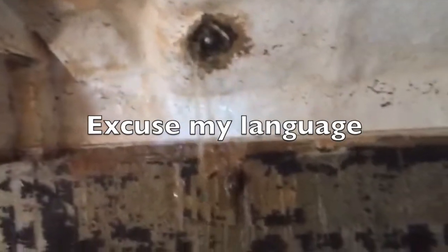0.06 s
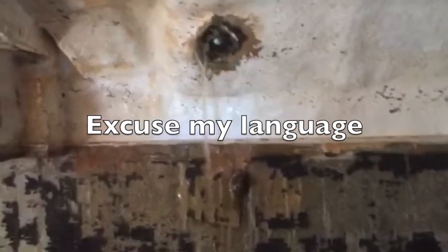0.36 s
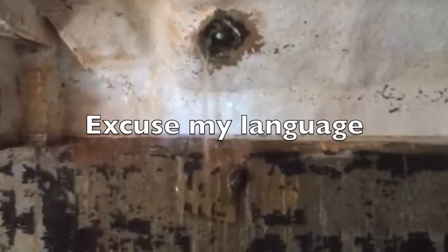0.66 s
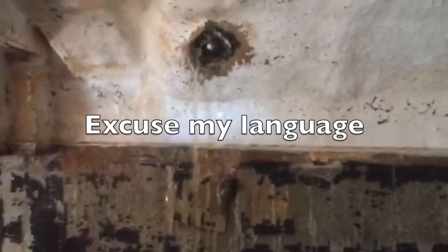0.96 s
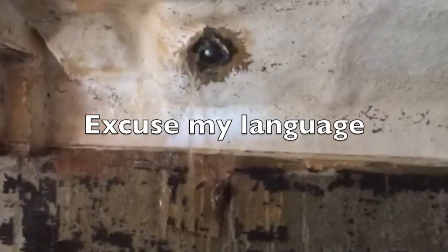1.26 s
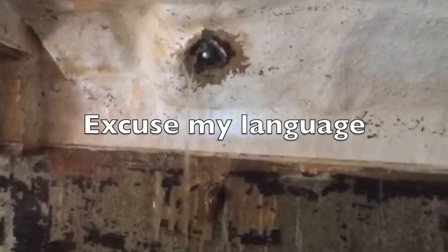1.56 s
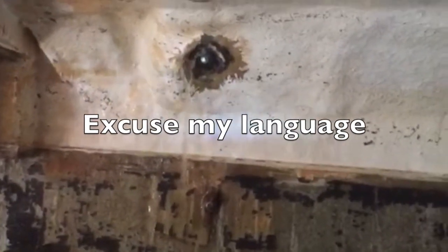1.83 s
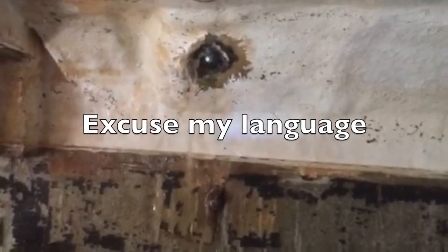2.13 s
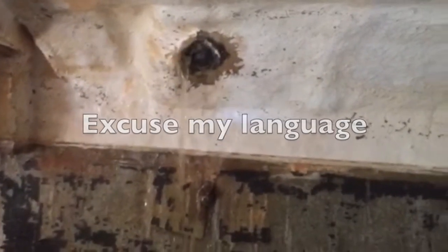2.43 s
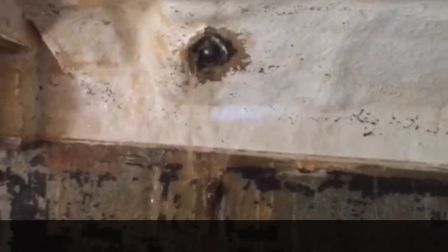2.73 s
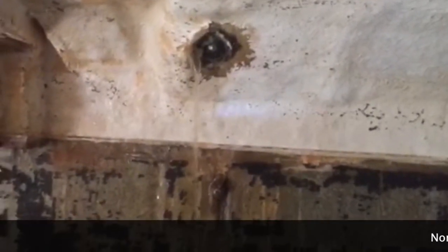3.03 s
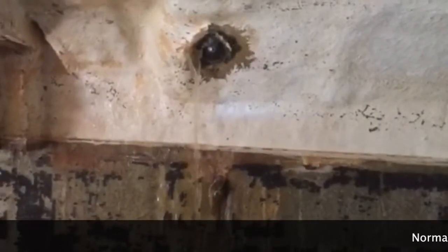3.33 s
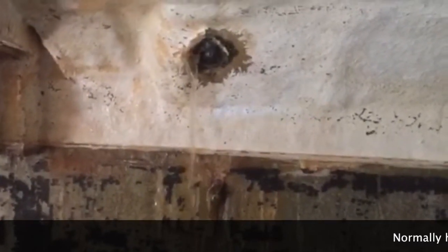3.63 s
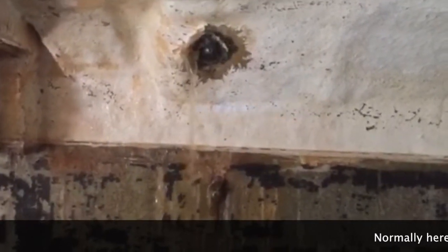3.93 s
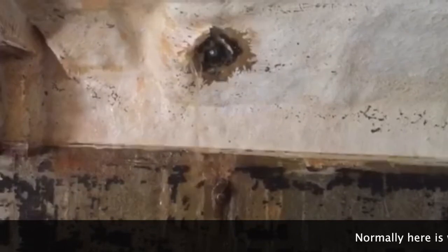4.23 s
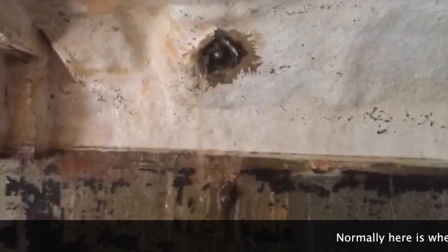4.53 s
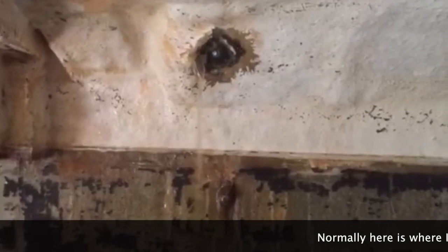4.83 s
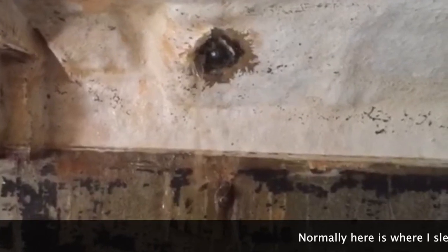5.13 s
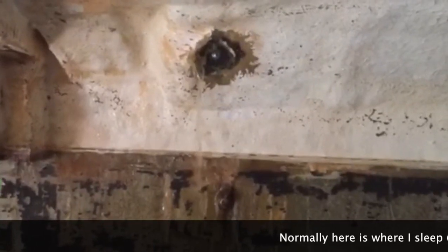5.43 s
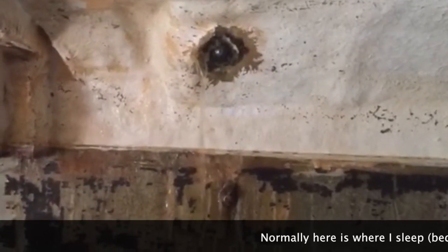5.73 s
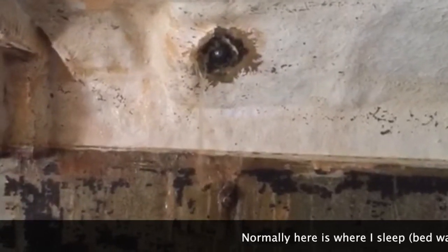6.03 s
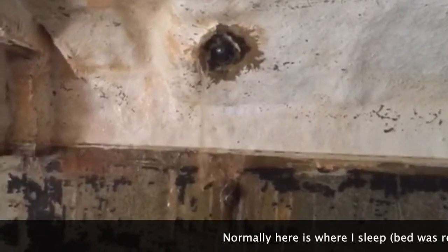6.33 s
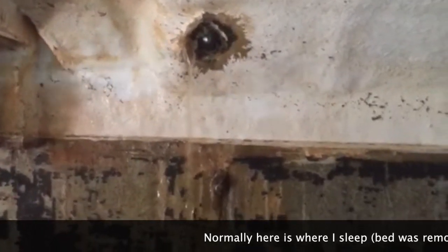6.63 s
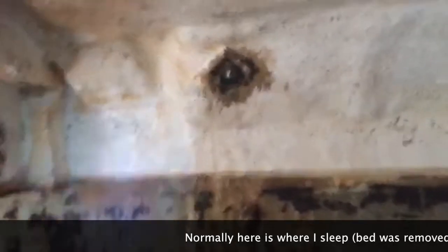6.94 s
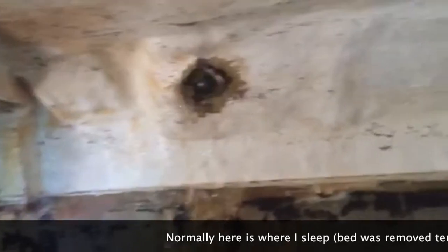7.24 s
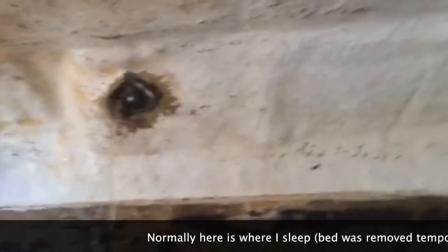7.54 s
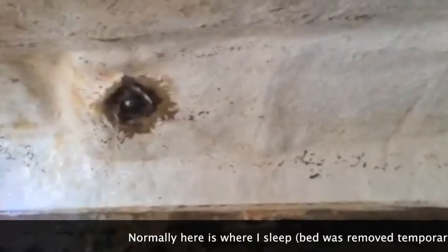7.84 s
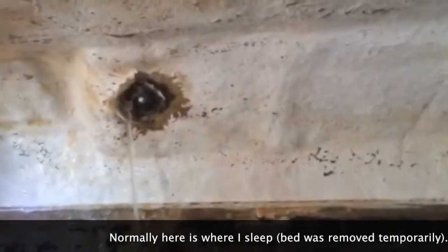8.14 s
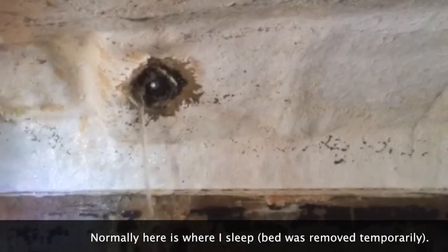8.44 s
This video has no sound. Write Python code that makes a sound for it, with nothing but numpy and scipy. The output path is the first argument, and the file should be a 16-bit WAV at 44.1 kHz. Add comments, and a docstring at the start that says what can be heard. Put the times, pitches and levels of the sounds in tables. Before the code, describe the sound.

Water leaks into a boat cabin with irregular ticking drips and a thin trickle, while dull rain patters on the deck outside.

```python
"""Drips from a leak in a boat's hull: each lands with a tick and a tiny ringing air bubble,
and the cramped cabin throws it back. The rainwater stream they break from trickles down the
inside wall: fizzing spray, splatter and gurgle, with a faint rustle-like wash around 7.3-8 s.
Outside, heavier drops thud on the deck amid dull rain patter and a low rumble."""
import sys
import numpy as np
from scipy import signal
from scipy.fft import rfft, irfft, next_fast_len
from scipy.io import wavfile

SR = 44100
rng = np.random.default_rng(int(sys.argv[2]) if len(sys.argv) > 2 else 0)


def persist_wave(psi):
    """Save psi, clipped to +-1, as 16-bit WAV."""
    counts = np.round(np.clip(psi, -1, 1) * 32767).astype(np.int16)
    wavfile.write(sys.argv[1], SR, np.atleast_2d(counts).T)


N = 378378

# big drips: t/s, relative tick energy/dB, bubble f/Hz, relative bubble energy/dB
DRIPS = [(0.3427, -10.5, 9310, -13), (0.4629, -7, 4570, -27), (0.843, -37, 10200, -14.5),
         (1.336, -34, 8600, -17), (1.4872, -20, 9600, -15), (1.6662, -11, 4430, -12.5),
         (1.801, -16.5, 3980, -36), (1.859, -21, 7800, -17), (2.0287, -16.5, 6360, -11),
         (2.294, -13, 11200, -25), (2.396, -50, 10000, -14.5), (2.47, -46, 1940, -31.5),
         (2.505, -49, 1520, -28.5), (2.55, -27, 1600, -29.5), (2.7308, -11, 7850, -21),
         (3.1175, -34, 7200, -8), (3.245, -14.5, 8900, -33), (3.2615, -17, 8400, -11),
         (3.292, -13, 11600, -25), (3.5094, -11, 6550, -12), (3.949, -21, 3850, -16),
         (4.1843, -32, 2410, -22.5), (4.211, -33, 4340, -26), (4.4974, -35, 6440, -15.5),
         (4.8076, -13, 5650, -5.5), (4.83, -14, 4540, -11.5), (5.0088, 6.5, 6600, -10),
         (5.4285, -34, 9800, -6), (5.6687, -19, 7060, -8.5), (5.728, -18, 4560, -28),
         (6.0994, 0.5, 5670, -16), (6.264, -14.5, 4440, -7.5), (6.2972, -19, 3700, -15.5),
         (6.4176, -13.5, 6620, -14), (6.7173, -25, 9520, -16), (6.8363, -25, 8750, -16.5),
         (6.994, -34, 9100, -15), (7.086, -20, 8790, -27), (7.2262, -20, 4850, -14.5),
         (7.2702, -19, 5960, -12), (7.3548, -18, 5700, -20), (7.3854, -6, 6140, -16),
         (7.4277, -11, 4800, -11), (7.5304, -26, 9400, -12), (7.6435, -15.5, 6900, -29),
         (7.8796, -15, 5000, -32), (7.895, -20, 3600, -22), (7.9347, -19, 3420, -22),
         (7.9873, -12.5, 6850, -28), (8.0417, -13.5, 8200, -35), (8.1675, -15.5, 8500, -23),
         (8.2837, -24, 11100, -12), (8.464, -31, 9200, -18)]
# wet wall resonances: f/Hz, width/Hz, level/dB re plain wall
WET_WALL_MODES = [(3600, 180, -13), (4000, 58, -14), (4280, 50, -13), (5710, 300, -4)]
# nearest wall reflections: delay/s, relative level/dB
WALL_ECHOES = [(.0015, -7.5), (.0071, -6), (0.0104, -10), (0.019, -11)]
# stream splatter: t/s, relative level/dB
SPLATTER_ENVELOPE = [(0.0, -59), (1.1, -57.5), (1.65, -57.5), (2.41, -60), (4.85, -58.5), (6.04, -62),
                     (6.24, -57), (6.79, -61.5), (7.41, -51.5), (8.58, -90)]
# stream gurgle, and a faint rustle-like wash around 7.3-8 s: t/s, relative level/dB
GURGLE_WASH_ENVELOPE = [(0.0, -64), (0.62, -72), (1.79, -60.5), (2.32, -67.5), (3.03, -64.5), (3.3, -64),
                        (3.58, -71.5), (4.66, -61), (4.83, -73), (5.33, -61.5), (5.83, -66), (6.14, -63),
                        (6.93, -70), (7.65, -58.5), (8.05, -70), (8.58, -69.5)]
# inside filter curves: f/Hz, level/dB
FIZZ_EQ = [(3000, -25), (5000, -34), (6000, -11), (7800, -10.5), (9000, -1), (10000, 3.5), (10450, -4),
           (11000, 1.5), (12000, 2.5), (15200, 1)]
SPLATTER_EQ = [(2000, -19), (3200, -4.5), (3800, -12.5), (4500, -6.5), (4900, -11.5), (5800, -2),
               (7500, -1), (9000, 8.5), (11000, -12)]
GURGLE_WASH_EQ = [(700, -3), (1250, 8.5), (1600, 8.5), (2400, 4.5), (3300, 5.5), (5000, 12.5)]
# drops thudding on the deck, placed by hand: t/s, relative level/dB
DECK_THUDS = [(0.464, -44), (1.243, -52), (1.309, -48.5), (1.359, -50), (1.891, -51.5), (2.98, -52),
              (3.155, -50.5), (3.368, -47), (3.51, -53), (3.619, -51), (3.722, -52), (3.948, -47.5),
              (4.137, -45.5), (4.497, -50.5), (5.009, -47), (5.642, -53.5), (6.04, -47.5), (6.7, -57.5),
              (7.085, -54), (8.167, -48.5)]
# hull panel resonances: f/Hz, width/Hz, level/dB re plain panel
HULL_MODES = [(159.2, 12.7, 8), (217, 13, 2.5), (266, 4.7, 12), (292.8, 7.6, 14), (346, 34, 5),
              (385.7, 12.2, 15.5), (498, 11, 12), (524, 11, 8), (584, 10, 3.5), (650, 56, 1), (691, 10, 11),
              (733, 6.7, 0), (933, 26, 15.5), (1203, 27, 11), (1308, 30, 9.5), (1317, 21, 6),
              (1478, 63, 13.5), (1783, 17, 14.5), (2150, 61, 6.5)]
# rain on the deck: t/s, level/dB
RAIN_ENVELOPE = [(0.0, -59), (1.4, -57), (4.3, -58), (4.95, -59), (6.6, -58.5), (8.58, -60)]
# outside filter curves: f/Hz, level/dB
THUD_EQ = [(150, 2.5), (350, 1), (700, 3), (1050, -2.5), (1500, -4.5), (3000, 0.5), (4500, -3), (8000, 5)]
DECK_EQ = [(90, -36), (160, -0.5), (300, -2.5), (450, -7), (700, -6.5), (820, -10.5), (1050, -21.5),
           (1600, -28), (3000, -28.5)]
RUMBLE_EQ = [(20, -39), (35, -15), (50, -1), (70, -11), (100, -12.5), (140, -21), (300, -16)]

CABIN_T60_S, DECK_T60_S = 0.18, 0.19


def drips(tick_gain_db=0.5, ring_gain_db=-2.5, deep_below_hz=2500):
    """Impact tick plus trapped bubble; large bubbles sit deeper and ring longer."""
    out = np.zeros(N)
    for t_s, tick_db, bubble_hz, ring_db in list(DRIPS) + droplets():
        # new landing spot, new echo
        echo = cabin_echo(direct_db=-1.5, near_db=5.5, near_t60_s=0.021, tail_db=7.0, tail_delay_s=0.0045)
        quickness = from_db(-0.16 * tick_db)   # heavy drops flatten slower: deeper tick
        tick = cut(echo, 0.58 * bubble_hz * quickness, "high", order=3)
        tick = cut(tick, 11800 * quickness, "low")
        cycles = 50 if bubble_hz < deep_below_hz else 7.3
        ring = signal.fftconvolve(bubble(bubble_hz, cycles, rise=0.0095), echo)
        ring = unit_energy(cut(ring, 0.64 * bubble_hz, "high", order=4))
        pinch_off_s = t_s + 2 / bubble_hz
        add(out, t_s, from_db(tick_db + tick_gain_db) * tick)
        add(out, pinch_off_s, from_db(ring_db + ring_gain_db) * ring)
    return resonate(out, WET_WALL_MODES)


def droplets(count=36, low_hz=2960, high_hz=11550, tilt_db_per_octave=5, spread_db=4.5):
    """Random small droplets as DRIPS rows; high ones are more common and louder."""
    when, smallness, strength = rng.random((count, 3)).T
    bubble_hz = low_hz * (high_hz / low_hz) ** np.sqrt(smallness)
    level_db = tilt_db_per_octave * np.log2(bubble_hz / high_hz) + spread_db * (2 * strength - 1)
    tick_db, ring_db = level_db - 23.5, level_db - 21
    return list(zip(when * N / SR, tick_db, bubble_hz, ring_db))


def bubble(hz, cycles, rise):
    """Trapped air swells, then rings down 60 dB in `cycles`; pitch rises as it nears the surface."""
    turns = np.arange(SR // 25) / SR * hz
    pitch_hz = hz * (1 + rise * np.minimum(turns / cycles, 1))
    envelope = (1 - np.exp(-turns)) * 1000 ** -(turns / cycles)
    return envelope * np.sin(2 * np.pi * np.cumsum(pitch_hz) / SR)


def cabin_echo(direct_db=-2, near_db=-1, near_t60_s=0.022, tail_db=4, tail_delay_s=0.0038):
    """Response at one spot: direct sound, near-wall scatter and slaps, short cabin tail."""
    t_s = np.arange(SR // 5) / SR
    echo = from_db(near_db) * dying_noise(t_s, near_t60_s)
    echo[0] += from_db(direct_db)
    for delay_s, level_db in WALL_ECHOES:
        add(echo, delay_s * rng.uniform(0.75, 1.25), from_db([level_db]))
    add(echo, tail_delay_s, from_db(tail_db) * dying_noise(t_s, CABIN_T60_S))
    return unit_energy(echo)


def trickle(fizz_db=-54, splatter_gain_db=1, gurgle_wash_gain_db=-2):
    """Thin stream: steady spray, wall splatter, gurgle; also a faint rustle-like wash near 7.65 s."""
    spray = rms_one(patter(per_s=1700, spread_db=4.0, t60_s=0.051))
    impacts = clicks(per_s=120, spread_db=5.5)
    crackle = rms_one(signal.fftconvolve(impacts, cabin_echo(near_db=-12, tail_db=-6))[:N])
    fizz = spray + from_db(-5) * crackle
    splatter = bubbling(per_s=190, low_hz=2920, high_hz=10600, cycles=6.4, spread_db=2.5)
    gurgle_wash = bubbling(per_s=260, low_hz=979, high_hz=3890, cycles=10.2, spread_db=2.5)
    splatter_db = in_time(SPLATTER_ENVELOPE) + splatter_gain_db
    gurgle_wash_db = in_time(GURGLE_WASH_ENVELOPE) + gurgle_wash_gain_db
    return (from_db(fizz_db) * rms_one(colour(fizz, FIZZ_EQ))
            + from_db(splatter_db) * rms_one(colour(splatter, SPLATTER_EQ))
            + from_db(gurgle_wash_db) * rms_one(colour(gurgle_wash, GURGLE_WASH_EQ)))


def bubbling(per_s, low_hz, high_hz, cycles, spread_db, sizes=40):
    """Swarm of mixed-size bubbles at one spot in the cabin."""
    births = clicks(per_s, spread_db)
    size_index = rng.integers(0, sizes, N)
    rings = [rms_one(bubble(hz, cycles, rise=0.25)) for hz in np.geomspace(low_hz, high_hz, sizes)]
    out = np.zeros(N)
    for at in np.flatnonzero(births):
        add(out, at / SR, births[at] * rings[size_index[at]])
    return signal.fftconvolve(out, cabin_echo(near_db=-35, tail_db=4.5))[:N]


def thuds(gain_db=27, attack_s=0.0019):
    """Heavy drops shake the deck, which spreads and dulls each blow."""
    out = np.zeros(N)
    t_s = np.arange(SR // 4) / SR
    attack = 1 - np.exp(-t_s / attack_s)
    shared_ring = dying_noise(t_s, DECK_T60_S)
    for onset_s, blow_db in list(DECK_THUDS) + random_thuds():
        spot_ring = dying_noise(t_s, DECK_T60_S)
        add(out, onset_s, from_db(blow_db + gain_db) * attack * (shared_ring + spot_ring))
    return resonate(colour(out, THUD_EQ), HULL_MODES)


def random_thuds(count=24, relative_db=-53.5, spread_db=2.5):
    """Further random drops on the deck, mostly a little softer, as DECK_THUDS rows."""
    when, strength = rng.random((count, 2)).T
    return list(zip(when * N / SR, relative_db + spread_db * (2 * strength - 1)))


def rain(rumble_db=-63):
    """Small drops drum on the deck over a low outdoor rumble."""
    drops = patter(per_s=280, spread_db=2.5, t60_s=0.1)
    drumming = resonate(colour(drops, DECK_EQ), HULL_MODES)
    rumble = colour(rng.standard_normal(N), RUMBLE_EQ) * from_db(drift(rate_hz=5.8))
    return from_db(in_time(RAIN_ENVELOPE)) * rms_one(drumming) + from_db(rumble_db) * rms_one(rumble)


def patter(per_s, spread_db, t60_s):
    """Dense impacts, each a decaying noise burst; energies add."""
    decay = from_db(-120 / (t60_s * SR))
    energy = signal.lfilter([1], [1, -decay], clicks(per_s, spread_db) ** 2 + 1e-18)
    return np.sqrt(energy) * rng.standard_normal(N)


def clicks(per_s, spread_db):
    """Random impulses, most small, a few large."""
    sizes = from_db(spread_db * np.minimum(rng.exponential(1, N), 4))
    signs = rng.choice([-1, 1], N)
    return sizes * signs * (rng.random(N) < per_s / SR)


def dying_noise(t_s, t60_s):
    """Diffuse tail, energy 1."""
    return unit_energy(rng.standard_normal(len(t_s)) * 1000 ** (-t_s / t60_s))


def drift(rate_hz):
    """Slow random curve, rms 1, one point per 40 samples."""
    pole = np.exp(-80 * np.pi * rate_hz / SR)
    noise = rng.standard_normal(N // 40 + 2002)
    slow = signal.lfilter([1], [1, -2 * pole, pole * pole], noise)[2000:]
    return np.interp(np.arange(N) / 40, np.arange(len(slow)), rms_one(slow))


def resonate(x, modes):
    """Struck surface: input plus its ringing modes."""
    out = x.copy()
    for hz, width_hz, level_db in modes:
        peak = signal.iirpeak(hz, hz / width_hz, fs=SR)
        out += from_db(level_db) * signal.lfilter(*peak, x)
    return out


def colour(x, eq):
    """Minimum-phase filter; 20 dB down an octave past each end of the curve."""
    size = next_fast_len(len(x) // 2 + SR // 10, True) * 2
    hz, level_db = np.transpose(eq)
    hz = np.r_[hz[0] / 2, hz, hz[-1] * 2]
    level_db = np.r_[level_db[0] - 20, level_db, level_db[-1] - 20]
    bins_hz = np.maximum(np.arange(size // 2 + 1) * SR / size, 1)
    gain = from_db(np.interp(np.log(bins_hz), np.log(hz), level_db))
    cepstrum = irfft(np.log(gain))
    cepstrum[1:size // 2] *= 2
    cepstrum[size // 2 + 1:] = 0
    return irfft(rfft(x, size) * np.exp(rfft(cepstrum)))[:len(x)]


def cut(x, hz, kind, order=2):
    """High- or low-pass."""
    return signal.sosfilt(signal.butter(order, min(hz, 0.45 * SR), kind, fs=SR, output="sos"), x)


def in_time(rows):
    """Breakpoints to a per-sample curve."""
    return np.interp(np.arange(N) / SR, *np.transpose(rows))


def add(out, t_s, sound):
    """Mix in at t_s."""
    at = max(round(t_s * SR), 0)
    out[at:at + len(sound)] += sound[:len(out) - at]


def from_db(db):
    """dB to gain."""
    return 10 ** (np.asarray(db) / 20)


def rms_one(x):
    """Scale to rms 1."""
    return x / np.sqrt(np.mean(x ** 2) + 1e-20)


def unit_energy(x):
    """Scale to energy 1."""
    return x / np.linalg.norm(x)


def scene():
    """Leak inside, rain outside; mono."""
    stream = trickle()
    return (drips() + stream + thuds() + rain())[None]


def record(dry, cutoff_hz=15200):
    """Steep low-pass."""
    return signal.sosfilt(signal.ellip(12, 0.1, 80, cutoff_hz, fs=SR, output="sos"), dry)


dry = scene()
out = record(dry)
persist_wave(out)
```